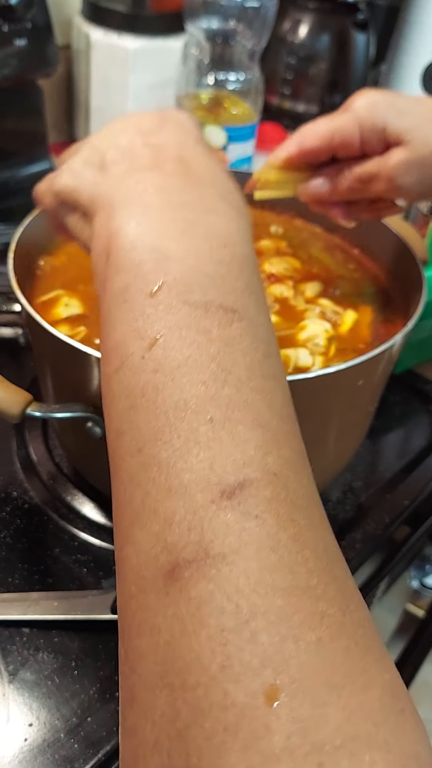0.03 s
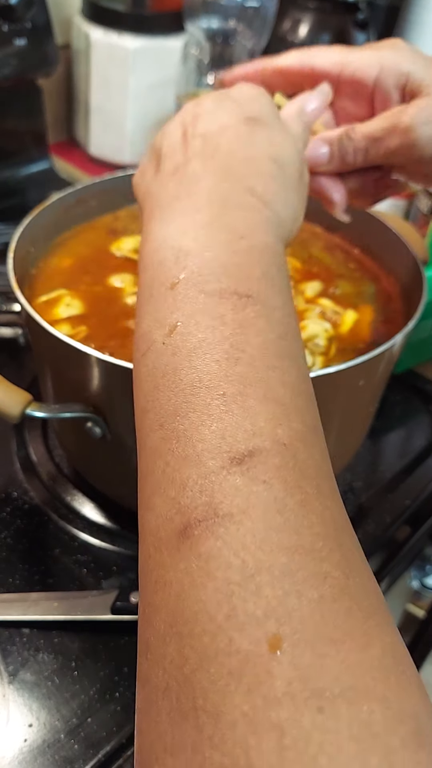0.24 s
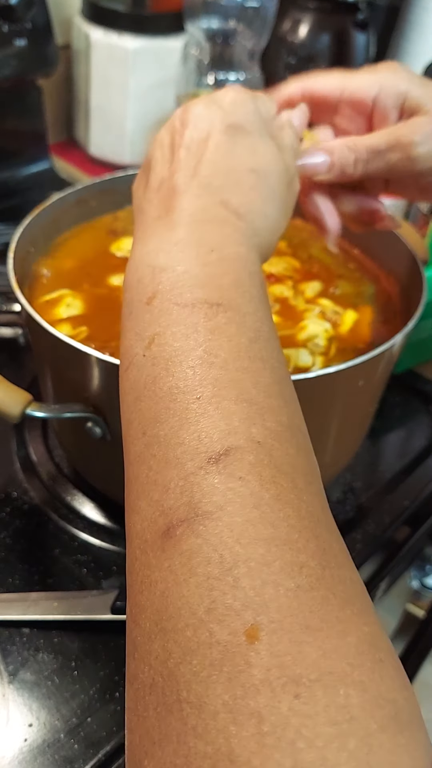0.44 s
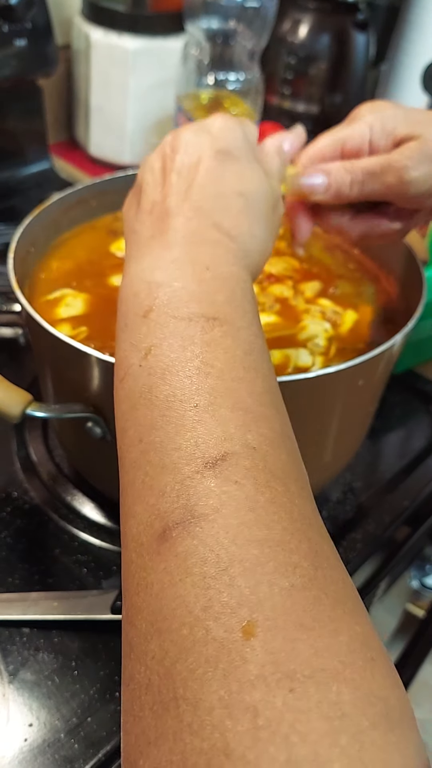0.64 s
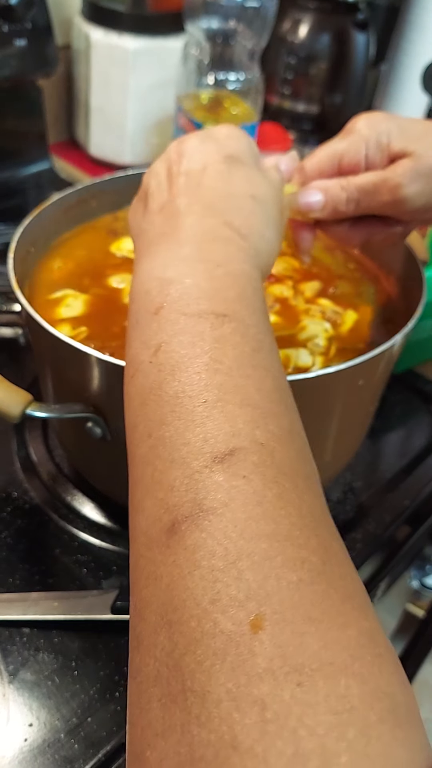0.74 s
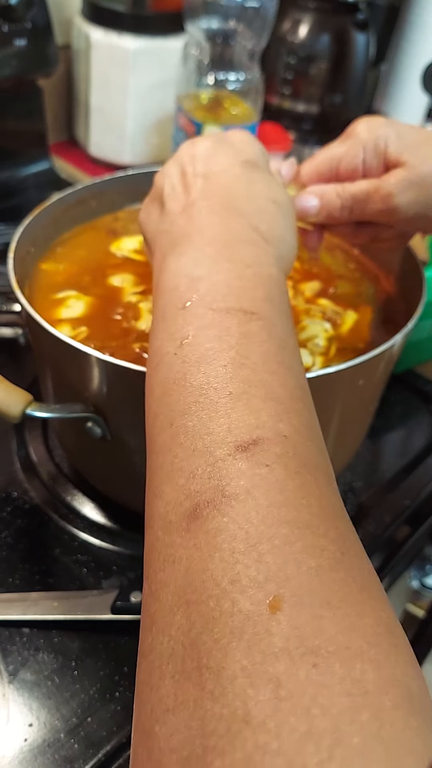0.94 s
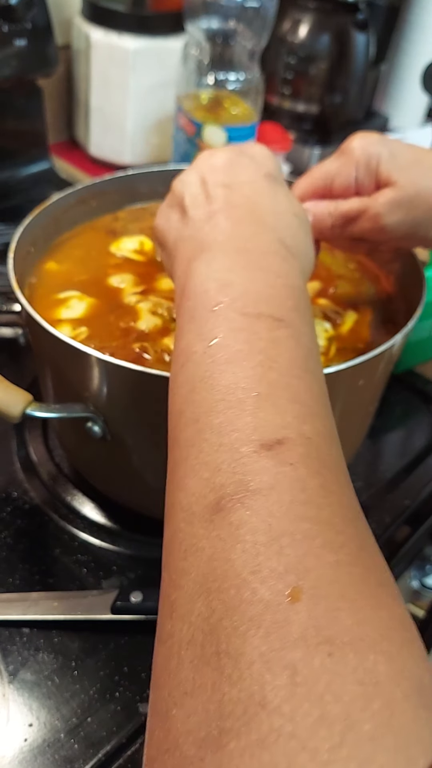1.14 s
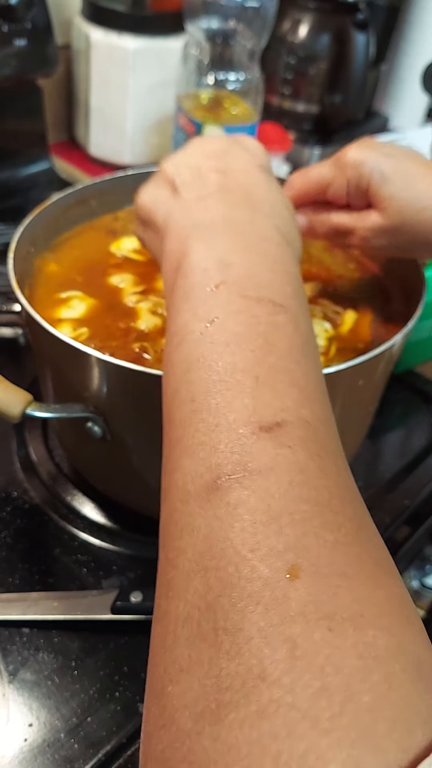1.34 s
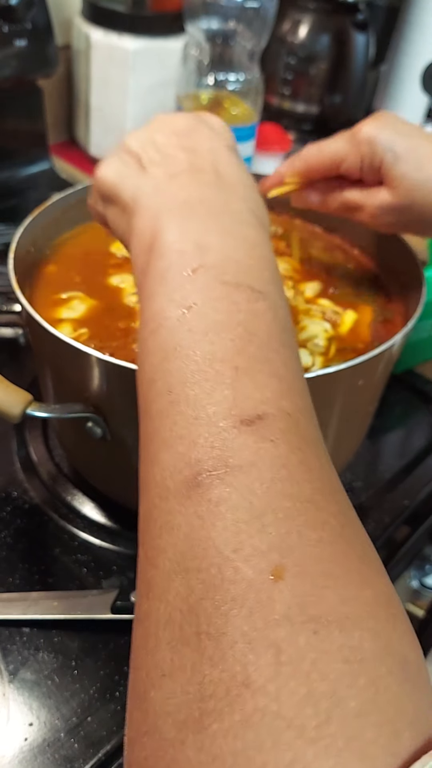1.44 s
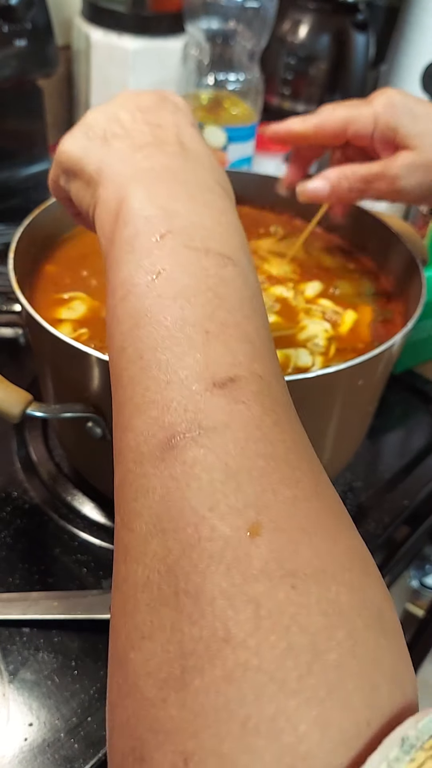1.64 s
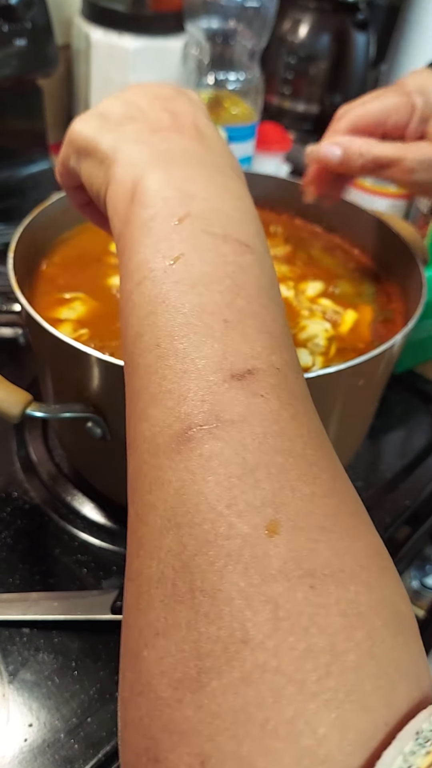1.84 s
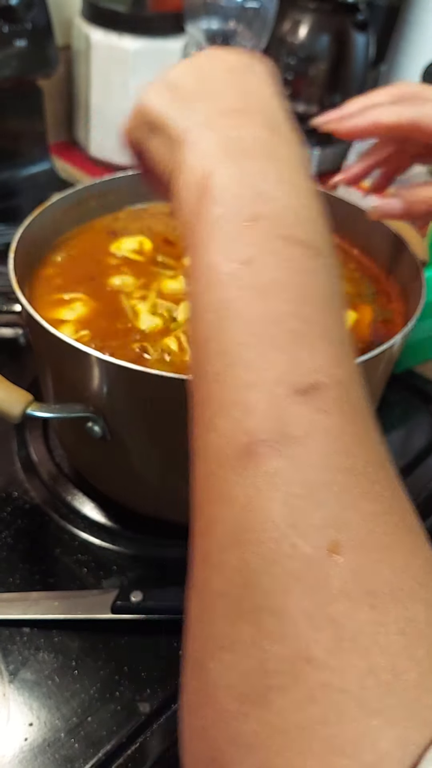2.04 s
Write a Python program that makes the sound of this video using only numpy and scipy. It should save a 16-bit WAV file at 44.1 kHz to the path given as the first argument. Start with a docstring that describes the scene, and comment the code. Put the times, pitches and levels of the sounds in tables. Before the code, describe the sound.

A small bundle of dry noodles snaps close to the microphone, slightly left. Faint ticks lead to a brittle volley of cracks and a dull knock, then the pieces rustle softly. A low hum and soft rush of air fill the kitchen.

```python
"""A kitchen, close over a pot of soup, the left microphone nearer the hands than the right.
A small bundle of dry noodles is bent: strands tick and rub between the fingers, two give way early,
then the rest snap in one quick volley, with a low knock on the left, and the pieces rustle on.
Hard walls add a short tail. Underneath, mains hum throbs against a motor in a soft rush of air."""
import sys
import numpy as np
from scipy import signal
from scipy.fft import rfft, irfft
from scipy.io import wavfile

SR = 44100
rng = np.random.default_rng(int(sys.argv[2]) if len(sys.argv) > 2 else 0)


def waveform_to_disk(signal):
    """Save audio, clipped to [-1, 1], as 16-bit WAV at the path in sys.argv[1]."""
    frames = np.transpose(np.atleast_2d(signal))
    scaled = np.clip(frames, -1, 1) * 32767
    samples = np.round(scaled).astype(np.int16)
    wavfile.write(sys.argv[1], SR, samples)


N = 91287


def noodles():
    """Bent strands crack in turn; returns the close stereo sound and the mono feed to the room."""
    # From small ticks to full breaks. Each row: start in seconds, level in dB, ring pitch in Hz,
    # ring level in dB against the burst, brightness in dB per octave.
    snaps = [(0.029, -45.5, 3200, -12, -2.5), (0.273, -46, 6900, -12, -6), (0.289, -45, 3240, -10.5, -6),
             (0.342, -43, 12900, 3, 2), (0.347, -43.5, 13500, 12, -1), (0.3991, -35, 6230, -8, -1.5),
             (.681, -44, 6300, -16, -1.5), (0.6982, -41, 10800, -16, 0.5), (0.7608, -37.5, 13300, -3, 1.5),
             (0.889, -48, 12000, -9, -5), (0.9109, -32, 3320, -12, -3), (0.929, -43, 12500, -11, -1),
             (.933, -27, 14900, -6, 8), (0.9349, -20, 14200, -3, 4.5), (.9395, -32, 13000, -13, -4),
             (1.1510, -12.5, 11540, 4, 2.5), (1.1513, -20.5, 10500, -2, -3), (1.155, -40.5, 14500, -6, 8),
             (1.1626, -19, 4910, -4.5, -2), (1.1688, -20, 11000, -8, 0), (1.1677, -15, 6900, -5.5, -2),
             (1.1730, -22, 11300, -10, 7), (1.1826, -11, 14100, -1, 1.5), (1.1887, -36, 13000, -6, 9),
             (1.368, -44.5, 12000, -15, 1), (1.4616, -45.5, 12100, -13, 3), (1.513, -46, 13200, -6, -1),
             (1.540, -41.5, 13000, -9, 1.5), (1.594, -47.5, 12000, -13, 0), (1.656, -45.5, 12100, -12, 0),
             (1.664, -39, 12000, -11, 9), (1.686, -37.5, 1380, -11, -7.5), (1.6917, -41.5, 1770, -7, 0),
             (1.698, -46, 12000, -12, 14), (1.717, -31, 6230, -16, -1), (1.7212, -43.5, 1540, -11, -10.5),
             (1.726, -36.5, 12600, -19, 7), (1.862, -45.5, 12000, -1, -1), (1.879, -43.5, 7900, -16, -9),
             (1.888, -44.5, 11950, -19, -3)]
    main_volley_s, tail_boost_db = 1.1, 2.5  # from the main volley on, cracks have a louder room tail
    near, room_feed = np.zeros((2, 2, N))
    for start_s, db, *strand in snaps:
        sound = crack(db, *strand)
        add(near, start_s, sound)
        add(room_feed, start_s, sound * amp(tail_boost_db * (start_s > main_volley_s)))
    return near, room_feed[0]


def crack(db, ring_hz, ring_db, tilt, size=2048):
    """One brittle fracture: a burst, a brief ring of the strand, and echoes off hands and pot."""
    # Spectrum of a fracture. Each row: frequency in Hz, relative level in dB.
    spectrum = [(200, -10), (800, -24), (2000, -20.5), (2600, -18), (3500, -20.5), (4900, -10), (5700, -13),
                (6800, -10), (9500, -7.5), (11500, -2.5), (15500, -3.5)]
    burst_s, scatter_s, ring_cycles = 0.0003, 0.0086, 2.2
    t = np.arange(size) / SR
    ring = unit(np.sin(2 * np.pi * ring_hz * t) * t * np.exp(-t * ring_hz / ring_cycles))
    sides = []
    for direct_db, scatter_db in ((0, -1.5), (-11, -7.5)):  # left, right
        fracture, echoes, echo_sizes = rng.standard_normal((3, size))
        burst = unit(colour(np.sign(fracture) * np.exp(-t / burst_s), spectrum, tilt))
        direct = unit(burst + amp(ring_db) * ring)
        scatter = echoes * abs(echo_sizes) * np.sqrt(t) * np.exp(-2 * t / scatter_s)
        scatter = unit(colour(scatter, spectrum, tilt))
        sides.append(amp(direct_db) * direct + amp(scatter_db) * scatter)
    return amp(db) * np.sqrt(SR / 1000) * np.array(sides)  # level taken over one millisecond


def rubbing():
    """Dry strands slip in tiny grains under each stroke of the fingers."""
    # Finger strokes. Each row: middle in seconds, half length in seconds, level in dB.
    strokes = [(.01, 0.028, -53), (0.172, 0.039, -59), (.27, 0.034, -65.5), (0.38, 0.036, -61),
               (0.535, 0.047, -57.5), (0.78, .03, -59.5), (1.452, .03, -62.5), (1.536, 0.047, -60.5),
               (1.615, 0.056, -65), (1.70, 0.014, -48), (1.882, 0.013, -49.5), (1.98, 0.035, -73)]
    # Spectrum of the friction. Each row: frequency in Hz, relative level in dB.
    spectrum = [(300, 1.5), (1500, -7), (3000, -12.5), (5000, -2.5), (9000, -5), (12500, -0.5),
                (15500, -0.5)]
    grains_per_s, spread_db, right_db = 4000, 4, -5
    t = np.arange(N) / SR
    power = sum((amp(db) * np.exp(-.5 * ((t - s) / half) ** 2)) ** 2 for s, half, db in strokes)
    sizes = amp(spread_db * np.minimum(rng.exponential(1, (2, N)), 4))
    grains = sizes * rng.choice([-1, 1], (2, N)) * (rng.random(N) < grains_per_s / SR)
    friction = np.array([evened(colour(side, spectrum)) for side in grains])
    return np.sqrt(power) * friction * amp([[0], [right_db]])


def knock():
    """A blow by the left microphone, likely from a flying piece: a short push and damped rings."""
    # Resonances of the blow. Each row: frequency in Hz, level in dB, decay in seconds.
    modes = [(52.8, -19.5, 0.014), (88, -24.5, 0.013), (1620, -24.5, 0.0012), (2630, -22, 0.00033)]
    start_s, push_s, push_db = 1.1675, 0.00047, -12.5
    t = np.maximum(np.arange(N) / SR - start_s, 0)
    push = amp(push_db) * t / push_s * np.exp(1 - t / push_s)
    rings = sum(amp(db) * np.sin(2 * np.pi * hz * t) * np.exp(-t / decay_s) for hz, db, decay_s in modes)
    return (push - rings) * np.array([[1], [0]])


def kitchen(x):
    """Hard walls return a dense tail that dies soonest in the treble."""
    # Reverberation time. Each row: frequency in Hz, seconds to fall by 60 dB.
    t60 = [(300, 0.38), (1500, .38), (5000, 0.38), (9000, 0.34), (15500, 0.25)]
    # Tone of the room. Each row: frequency in Hz, gain in dB.
    tone = [(200, -10), (1500, -2.5), (3500, 0), (5000, -0.5), (8500, -3), (10500, -2.5), (13000, -0.5),
            (15500, -2)]
    room_db, build_s = -8.5, 0.012
    hz, frame_s, bands = signal.stft(rng.standard_normal((2, SR // 2)), SR, nperseg=256)
    decay = amp(-60 * frame_s / read(t60, hz)[:, None])
    tails = signal.istft(bands * decay, SR, nperseg=256)[1]
    t = np.arange(tails.shape[1]) / SR
    tails *= 1 - np.exp(-(t / build_s) ** 2)
    responses = [colour(unit(tail), tone) for tail in tails]
    return amp(room_db) * np.array([signal.fftconvolve(x, response)[:N] for response in responses])


def hum():
    """Mains harmonics and a slightly slower motor beat against each other."""
    # Mains buzz. Each row: multiple of its lowest tone, left level in dB, right level in dB.
    mains = [(1, -48.5, -52.5), (2, -51, -50), (3, -68, -59.5), (4, -68, -62.5), (5, -77, -73.5),
             (6, -77, -69.5)]
    # The motor's drone and thin whine. Each row: frequency in Hz, left level in dB, right level in dB.
    motor = [(110.68, -43, -45), (496.2, -68, -62)]
    # Rise and fall of the whole hum. Each row: time in seconds, gain in dB.
    swell = [(0, -0.5), (.88, 1), (1.05, 5.5), (1.15, 0.5), (1.27, -1), (1.55, -1.5), (1.68, -2.5),
             (1.88, -1.5), (2.07, -.5)]
    buzz_hz, throb_crest_s, right_lag_s = 120.0, 0.066, 0.00018
    waver_rad, waver_db = 0.07, 0.6
    t = np.arange(N) / SR
    from_crest = t - throb_crest_s - np.array([[0], [right_lag_s]])
    harmonics = [(k * buzz_hz, left_db, right_db) for k, left_db, right_db in mains]
    tones = np.zeros((2, N))
    for hz, left_db, right_db in harmonics + motor:
        phase = 2 * np.pi * hz * from_crest + waver_rad * drift(rate_hz=5.64)
        tone = np.cos(phase) * amp(waver_db * drift(rate_hz=6))
        tones += np.sqrt(2) * amp([[left_db], [right_db]]) * tone
    return tones * amp(np.interp(t, *np.transpose(swell)))


def air():
    """Moving air rushes softly, nearly mono in the bass, swelling toward the break."""
    # Spectrum of the rush. Each row: frequency in Hz, relative level in dB.
    spectrum = [(20, -30), (35, -12.5), (52, -7), (80, -9), (120, 0), (165, -10), (250, -2.5), (330, -6.5),
                (430, -13), (620, -15), (1000, -19.5), (1400, -25), (2000, -29.5), (5000, -36),
                (15500, -49.5)]
    # Likeness at the two microphones. Each row: frequency in Hz, correlation from 0 to 1.
    likeness = [(30, 1), (100, 0.92), (300, 0.92), (700, 0.17), (1500, 0.068), (15000, .1)]
    # Rise and fall of the rush. Each row: time in seconds, gain in dB.
    swell = [(0, 1), (.3, 2.5), (.75, 2), (.97, 5), (1.13, 7.5), (1.3, 0), (1.7, 0.5), (2.07, 0)]
    base_db, right_db = -51, -2.5
    hz = np.fft.rfftfreq(N, 1 / SR)
    left, independent = rfft(rng.standard_normal((2, N)))
    same = read(likeness, hz)
    right = same * left + np.sqrt(1 - same ** 2) * independent
    rush = evened(irfft(np.array([left, right]) * amp(read(spectrum, hz)), N))
    swell_db = np.interp(np.arange(N) / SR, *np.transpose(swell))
    return rush * amp(base_db + swell_db) * amp([[0], [right_db]])


def amp(db):
    """Decibels to gain."""
    return 10 ** (np.asarray(db) / 20)


def evened(x):
    """Scales to rms 1."""
    return x / np.sqrt(np.mean(x ** 2) + 1e-20)


def unit(x):
    """Scales to energy 1."""
    return x / np.sqrt(np.sum(x ** 2) + 1e-20)


def read(points, hz):
    """Reads a table on a log-frequency axis."""
    f, value = np.transpose(points)
    return np.interp(np.log(hz + 1), np.log(f + 1), value)


def add(mix, start_s, sound):
    """Mixes a stereo sound in at its start time."""
    part = mix[:, round(start_s * SR):][:, :sound.shape[1]]
    part += sound[:, :part.shape[1]]


def colour(x, points, tilt=0, size=1024):
    """Minimum-phase filter with the given spectrum, tilted above 1 kHz in dB per octave."""
    hz = abs(np.fft.fftfreq(size, 1 / SR))
    octaves = np.log2(np.maximum(hz, 1000) / 10000)
    log_gain = np.log(amp(read(points, hz) + tilt * octaves))
    taps = np.fft.ifft(np.exp(np.conj(signal.hilbert(log_gain)))).real
    return signal.fftconvolve(x, taps)[:len(x)]


def drift(rate_hz, count=20):
    """Slow random wander of rms 1."""
    t = np.arange(N) / SR
    rates = np.geomspace(rate_hz / 10, rate_hz, count)
    return evened(sum(np.sin(2 * np.pi * (hz * t + rng.random())) / np.sqrt(hz) for hz in rates))


def scene():
    """The noodles and their room, duller on the far microphone, with the knock, hum and air."""
    # Shading at the far, right microphone. Each row: frequency in Hz, gain in dB.
    right_shade = [(200, -14), (2500, 2.5), (5000, -1.5), (9000, 1.5), (10000, -7), (12000, -3.5),
                   (15500, -6.5)]
    cracks, room_feed = noodles()
    rub = rubbing()
    left, right = cracks + rub + kitchen(room_feed + rub[0])
    return np.array([left, colour(right, right_shade)]) + knock() + hum() + air()


def record(dry):
    """The recorder cuts off the highest treble."""
    edge_hz = 15950
    lowpass = signal.firwin(401, edge_hz, window=("kaiser", 9), fs=SR)
    return signal.oaconvolve(dry, lowpass[None], "same")


dry = scene()
out = record(dry)
waveform_to_disk(out)
```